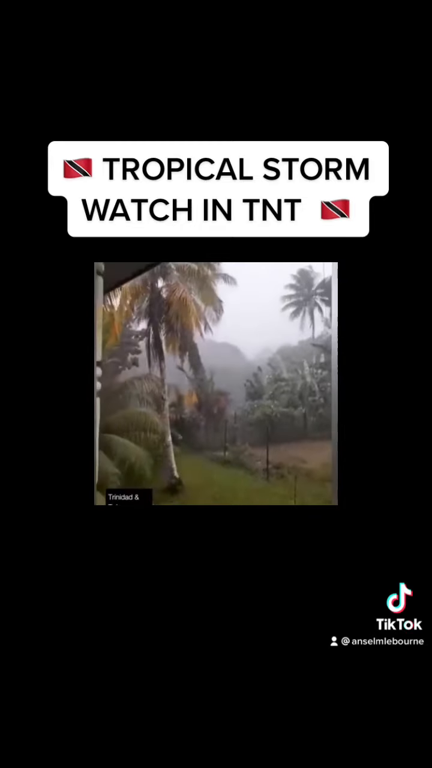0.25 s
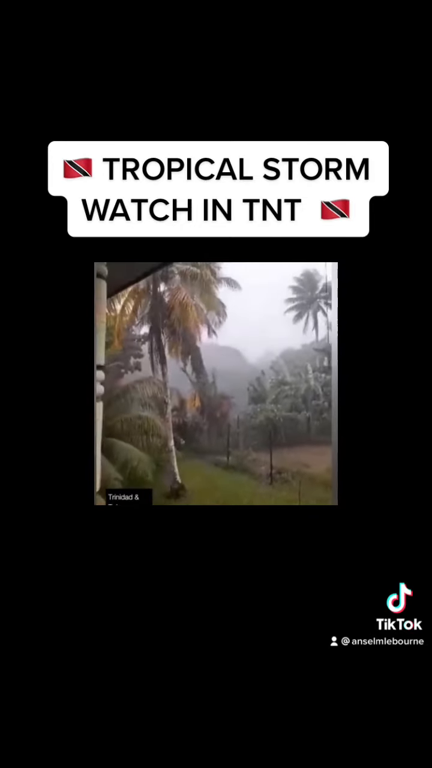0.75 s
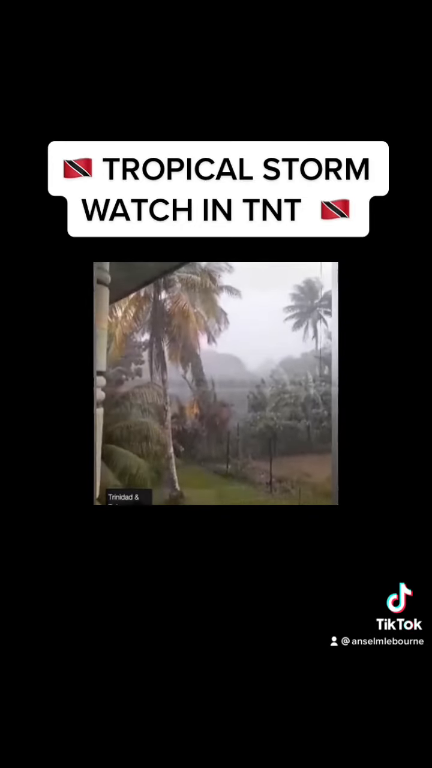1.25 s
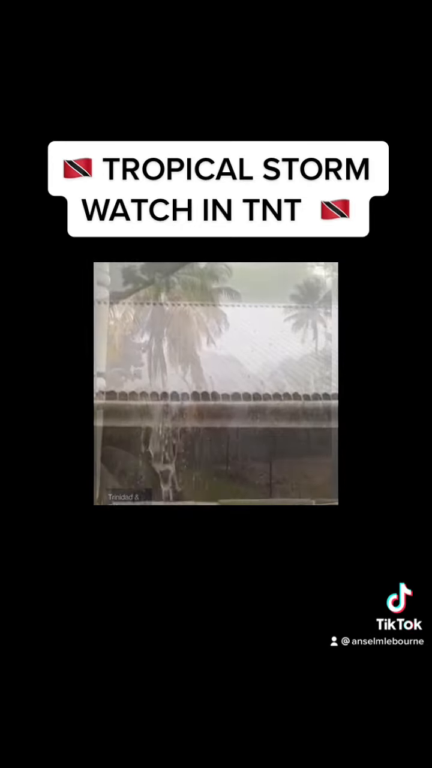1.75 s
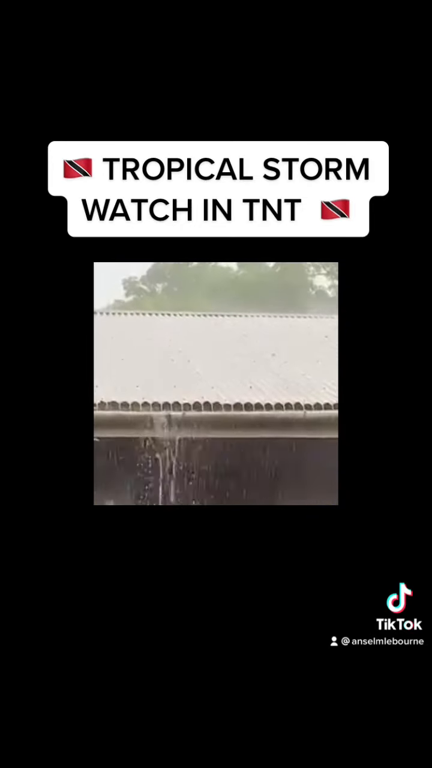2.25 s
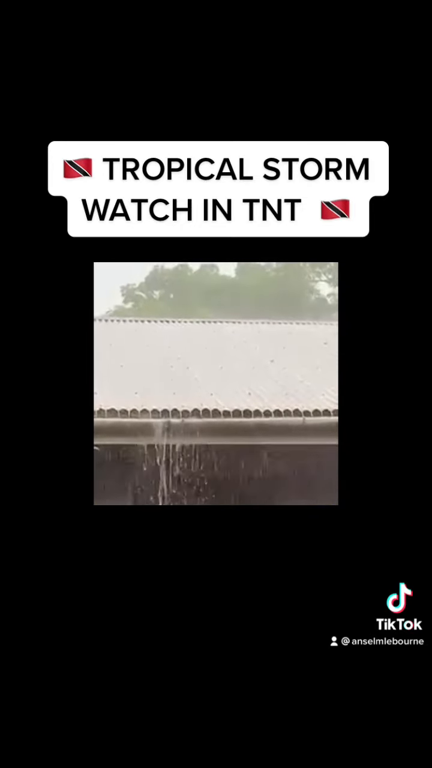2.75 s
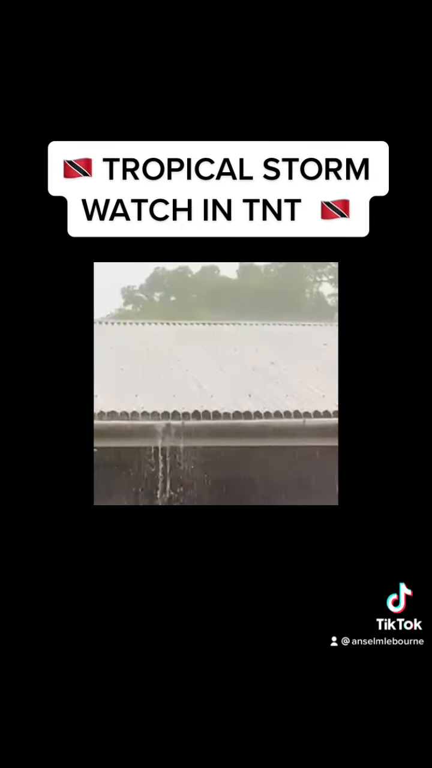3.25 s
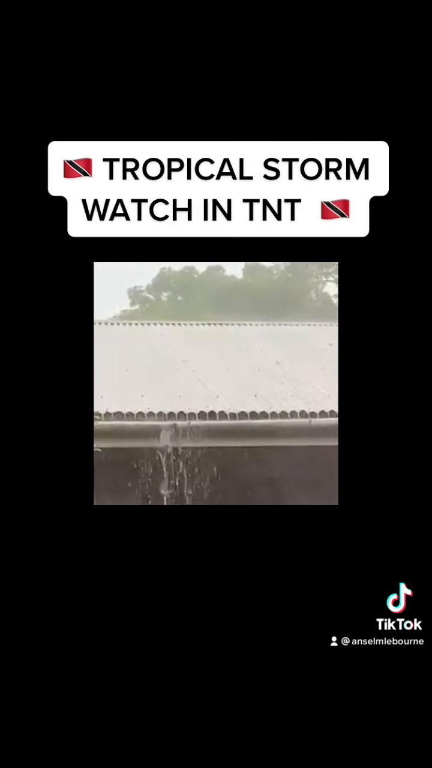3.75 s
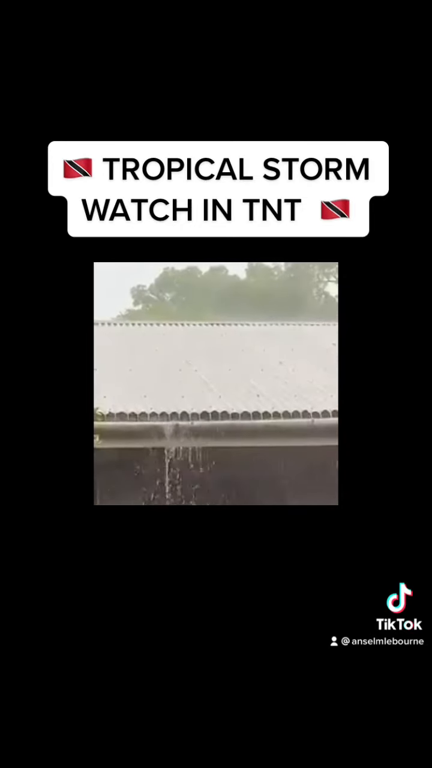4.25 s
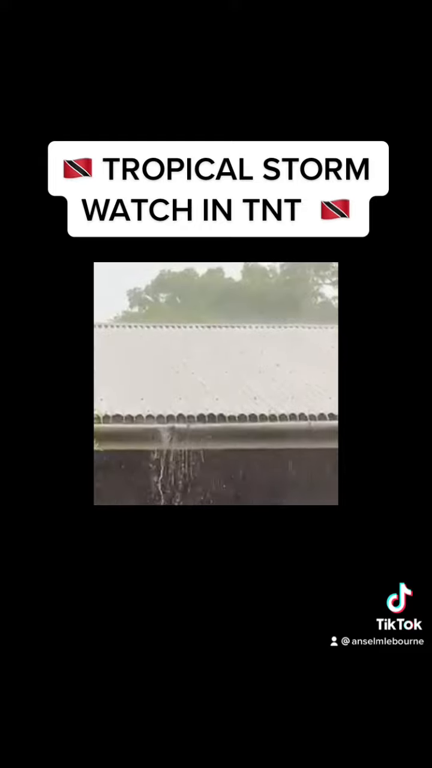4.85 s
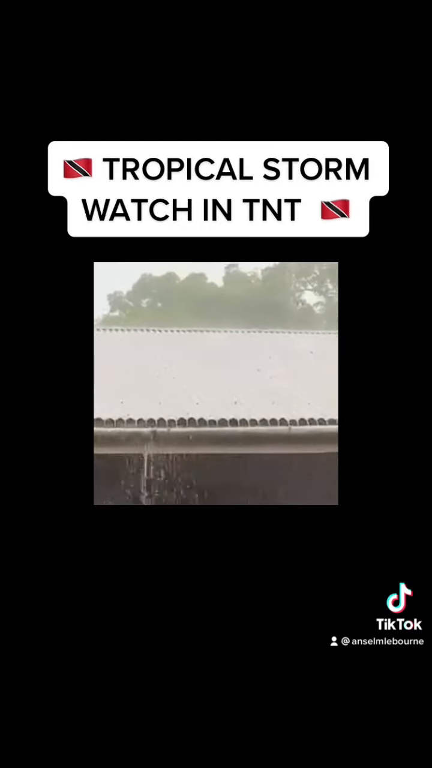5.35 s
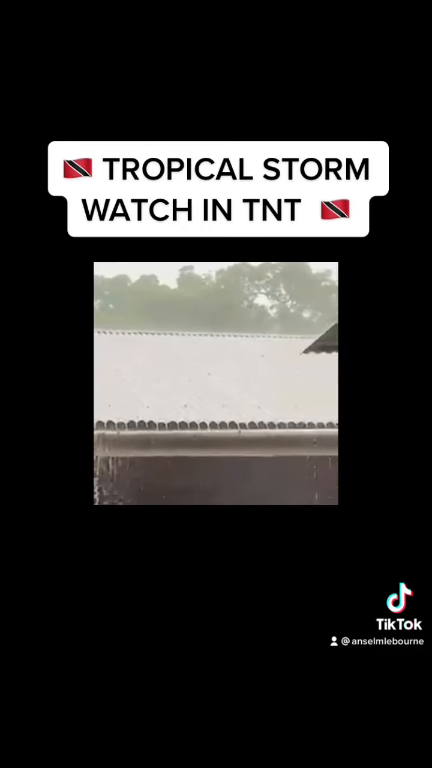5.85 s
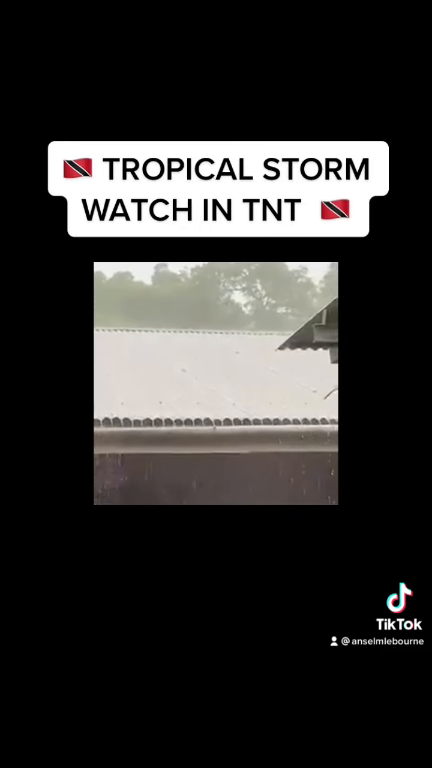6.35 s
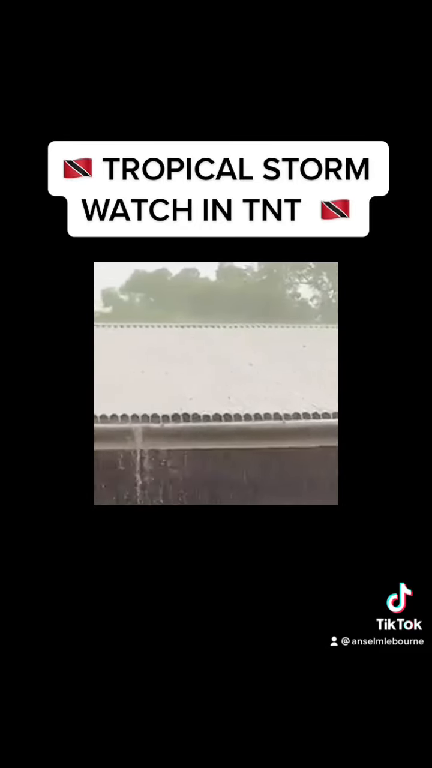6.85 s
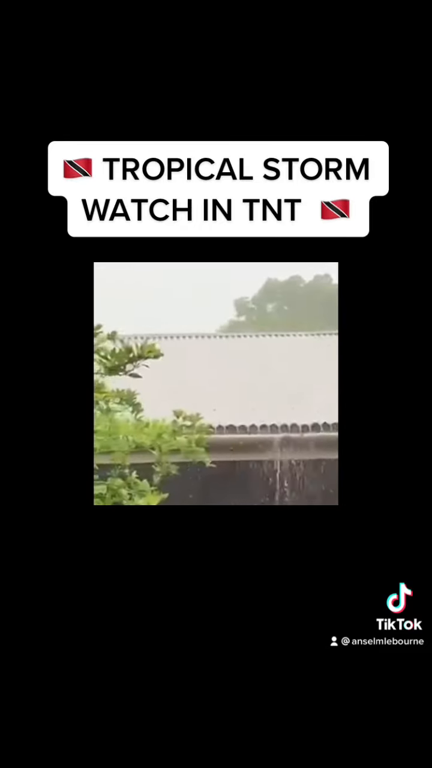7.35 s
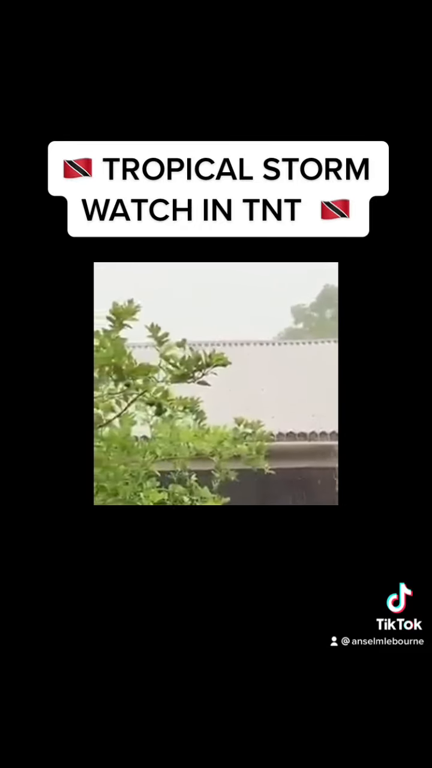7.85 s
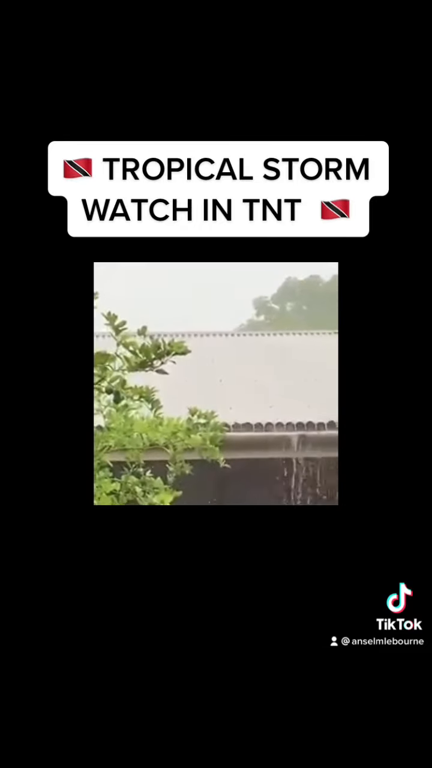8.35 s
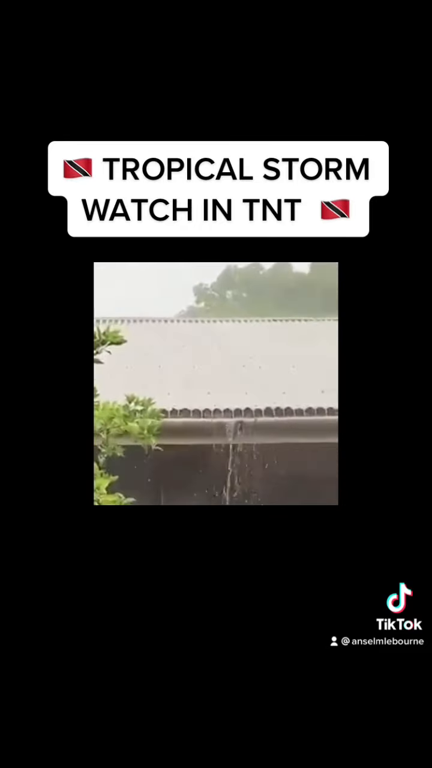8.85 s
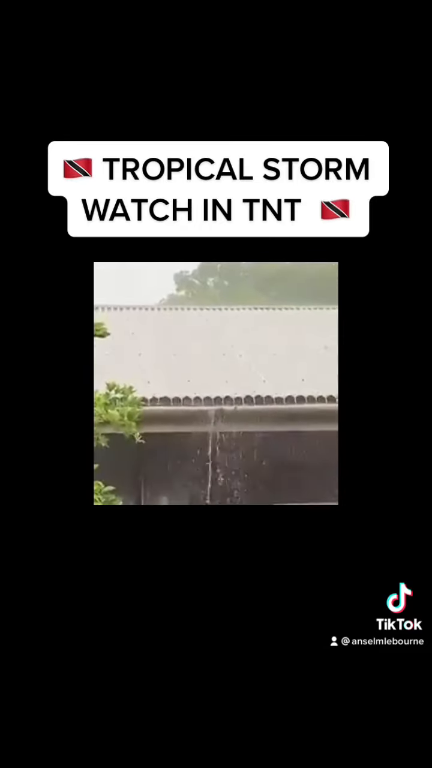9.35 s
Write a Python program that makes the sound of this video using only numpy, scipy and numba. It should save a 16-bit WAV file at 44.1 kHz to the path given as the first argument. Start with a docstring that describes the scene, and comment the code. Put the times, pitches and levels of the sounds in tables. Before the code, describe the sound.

A steady downpour shifts from a garden to a metal roof, where water splashes off the edge and larger drops tap over a wavering rumble.

```python
"""A roar of heavy tropical rain over a garden, then, from a second shelter, on a corrugated metal roof.
Thousands of drops a second blur into a wash; the level sags as one place gives way to the other.
On the roof side run-off spatters from the edge, larger drops thump the sheet, a few drips ring on
metal and one fat drop smacks nearby, while a low boom wavers underneath."""
import sys
import numpy as np
from scipy import signal
from scipy.fft import rfft, irfft
from scipy.io import wavfile
from scipy.ndimage import uniform_filter1d
from numba import njit

SR = 44100
rng = np.random.default_rng(int(sys.argv[2]) if len(sys.argv) > 2 else 0)


def inscribe(sig):
    """Save sig as 16-bit PCM at rate SR to the path in sys.argv[1].

    A 1-D sig is mono; a 2-D sig holds one channel per row.
    Samples are clipped to [-1, 1] before scaling.
    """
    pcm = np.round(np.clip(np.atleast_2d(sig).T, -1, 1) * 32767)
    wavfile.write(sys.argv[1], SR, pcm.astype(np.int16))


N = 423801
T = np.arange(N) / SR
HZ = np.maximum(np.fft.rfftfreq(N, 1 / SR), 1)

# the low boom, swelling and sinking: time_s, level_db
BOOM_LEVEL = [(1.8, -61), (2.2, -47), (2.8, -49), (3.1, -59), (3.9, -43.5), (4.05, -56), (4.35, -47),
              (5.1, -55), (5.4, -50), (5.55, -53), (6.02, -41.5), (6.25, -58), (6.74, -44), (6.87, -58),
              (7.3, -41), (7.55, -51), (7.72, -45), (8.26, -58), (8.5, -47), (8.88, -44.5), (9, -62)]
# its pitch, creeping upward: time_s, pitch_hz
BOOM_PITCH = [(1.8, 53), (3.1, 54.6), (4.6, 59), (6, 63.5), (6.8, 66), (8.3, 64.5), (9.1, 74)]
# drips on a ringing piece of metal: start_s, strike_db, left_minus_right_db
DRIPS = [(6.666, -29, 1.0), (6.7171, -27.5, -3.0), (6.772, -29, -2), (6.826, -28.5, 6), (6.858, -30, 7.0)]
# larger drops thumping the sheet: start_s, strike_db, pitch_hz
THUMPS = [(2.9674, -19, 1820), (3.6262, -19, 1600), (3.8694, -24, 2070), (4.6785, -20, 1830),
          (4.93, -26, 1830), (6.1424, -25, 1820), (8.3779, -23, 1660), (9.2144, -21, 1990)]
# the fat drop close by: start_s, peak_db, pitch_hz
SMACK = [(8.275, -6, 6300)]
# its impact and splash-back: delay_s, strike_db
SPLASH_BACK = [(0, 6), (.0003, 5), (.0008, 1), (.0014, 4), (.0019, 2), (.0045, -4), (.0097, -2), (.013, -5),
               (.0165, -2)]
# level ride of the downpour at each place: time_s, level_db
GARDEN_LEVEL = [(0, -28), (.2, -28), (.43, -28), (.5, -27.5), (.63, -26), (.75, -28.5), (.87, -27.5),
                (.95, -29.5), (1.03, -27), (1.16, -29.5), (1.25, -28.5)]
ROOF_LEVEL = [(2.2, -30.5), (2.5, -30), (2.88, -30), (2.97, -27.5), (3.1, -29), (3.4, -29), (4.3, -27.5),
              (4.9, -27.5), (5.6, -28), (6.1, -26.5), (6.9, -27.5), (7.7, -28), (9.2, -27.5), (9.61, -27.5)]
# tone colour of the rain: frequency_hz, relative_gain_db
GARDEN_COLOUR = [(10, -52), (30, -13.5), (110, 0.5), (190, -5), (280, 1), (400, -2), (700, 0), (1200, -3),
                 (2200, -3.5), (2700, -9.5), (7400, -15.5), (7800, -24), (9500, -26.5), (9950, -41)]
ROOF_COLOUR = [(25, -5.5), (95, 0), (135, 3), (160, 1.5), (182, 3), (230, -2), (300, 2.5), (360, -1),
               (480, 2), (690, 3), (830, 0.5), (1000, 1.5), (1300, 1.5), (1580, -0.3), (1800, 0.6),
               (2050, -1), (2550, -4.5), (3000, -4), (3500, -6), (4200, -8), (5200, -14), (7200, -12.5),
               (7550, -16), (7780, -22), (8000, -16), (8500, -11.5), (9680, -19), (9780, -78.5)]
# stereo width (far below 0 is mono, far above is out of phase): frequency_hz, side_minus_mid_db
GARDEN_WIDTH = [(60, -5), (190, -9), (550, -7), (1200, 0), (7700, .5), (8100, -6), (8800, -1.5),
                (10000, -3)]
ROOF_WIDTH = [(100, -48.5), (330, -12.5), (850, -1.5), (1700, -3), (2400, 2.5), (3200, -1.5), (3900, 1.5),
              (4300, 44), (5400, 84), (5750, -29.5), (6050, -21), (7400, -36.5), (7750, -17), (8100, 0),
              (8500, -3)]
# bands of the rain that flicker on their own: centre_hz
FLICKER_BANDS = [80, 200, 400, 700, 1100, 1700, 2500, 3300, 4000, 4800, 5700, 7000, 8800]


def undb(db):
    """Gain of a level in dB."""
    return 10 ** (np.asarray(db) / 20)


def over_time(table):
    """A (time_s, value) table read at every sample."""
    return np.interp(T, *np.transpose(table))


def over_frequency(table):
    """A (frequency_hz, value) table read at every frequency, on a log axis."""
    hz, value = np.transpose(table)
    return np.interp(np.log(HZ), np.log(hz), value)


def wander(rate_hz):
    """Smooth random drift: stepped values slewed twice, with a spread near 1."""
    hold = int(SR / rate_hz)
    steps = np.repeat(rng.standard_normal(N // hold + 1), hold)
    return 1.09 * uniform_filter1d(uniform_filter1d(steps, hold), hold)[:N]


@njit
def swept_band(x, hz, width_hz):
    """State-variable band-pass with a moving centre, gain 1 there."""
    out, band, low = np.empty(len(x)), 0., 0.
    for i in range(len(x)):
        tuning, damping = np.tan(np.pi * hz[i] / SR), width_hz / hz[i]
        swing = (band + tuning * (x[i] - low)) / (1 + tuning * (tuning + damping))
        band, low = 2 * swing - band, low + 2 * tuning * swing
        out[i] = damping * swing
    return out


def resonate(x, hz, width_hz):
    """Band-pass parked on one pitch."""
    return swept_band(x + 1e-18, np.full(N, float(hz)), float(width_hz))


@njit
def pings(start_s, hz, t60_s, strength):
    """Each drop sets one resonance ringing until it has died away."""
    out = np.zeros(N)
    for k in range(len(start_s)):
        start = int(start_s[k] * SR)
        pole = np.exp(2j * np.pi * hz[k] / SR - np.log(1000) / (t60_s[k] * SR))
        phasor = strength[k] + 0j
        for i in range(start, min(start + int(t60_s[k] * SR), N)):
            out[i] += phasor.imag
            phasor *= pole
    return out


def boom():
    """A low mono drone, blurred with narrow noise, that drifts in pitch and wavers in level."""
    hz = over_time(BOOM_PITCH)
    wobbling_hz = hz * (1 + .017 * wander(8.1))
    drone = np.sqrt(2) * np.sin(2 * np.pi * np.cumsum(wobbling_hz) / SR)
    blur = swept_band(rng.standard_normal(N), hz, width_hz=1.2)
    return undb(over_time(BOOM_LEVEL) + wander(11)) * (drone + .5 * blur / np.std(blur))


def drips(pitch_hz=2410, t60_s=.13):
    """A few drips strike sheet metal softly and ring on one note."""
    start_s, strike_db, pan_db = np.transpose(DRIPS)
    each = np.ones(len(DRIPS))
    ears = [pings(start_s, pitch_hz * each, t60_s * each, undb(strike_db + side * pan_db / 2))
            for side in (1, -1)]
    # the soft contact takes a few cycles to build the ring
    return np.array([resonate(ear, pitch_hz, width_hz=150) for ear in ears])


def thumps(t60_s=.022):
    """Larger drops land softly and ring the sheet briefly; two band-passes round off the attack."""
    start_s, strike_db, hz = np.transpose(THUMPS)
    sheet = pings(start_s, hz, np.full(len(THUMPS), t60_s), undb(strike_db))
    for _ in range(2):
        sheet = resonate(sheet, np.mean(hz), width_hz=1500)
    return sheet


def smack(spray_db=-14, spray_decay_s=.012, knock_hz=2200):
    """A fat drop cracks brightly, thrown-up droplets land after it and fine spray hisses briefly."""
    out = np.zeros((2, N))
    for start_s, peak_db, pitch_hz in SMACK:
        splash = np.zeros((2, N))
        for delay_s, strike_db in SPLASH_BACK:
            splash[:, int((start_s + delay_s) * SR)] = undb(strike_db)
        spray = (T > start_s) * np.exp(-np.maximum(T - start_s, 0) / spray_decay_s)
        splash += undb(spray_db) * spray * rng.standard_normal((2, N))
        crack = np.array([resonate(ear, pitch_hz, width_hz=1700) for ear in splash])
        # the struck surface answers with a lower knock
        knock = np.array([resonate(ear, knock_hz, width_hz=900) for ear in splash])
        hit = crack + knock
        out += undb(peak_db) * hit / np.max(np.abs(hit))
    return out


def patter(tick_chance, spread_db, ping_db, ring_s, ping_count=30000):
    """Hiss of countless far drops, ticks of near ones, and pings off sheet, leaf or puddle."""
    lands = rng.random(N) < tick_chance
    size = np.minimum(rng.exponential(1, N), 5)
    hiss = rng.standard_normal(N)
    ticks = lands * undb(spread_db * size) * np.sign(hiss)
    when, pitch, length, blow = rng.random((ping_count, 4)).T
    hz = 200 + 9600 * pitch
    t60_s = ring_s * (.5 + length) * (hz / 1000) ** -.3
    # low pings are alike, high ones differ more in strength
    strike_db = -3.5 * np.clip(hz / 1500, .45, .9) * np.log(blow + .015)
    ringing = pings(when * N / SR, hz, t60_s, undb(strike_db) / np.sqrt(t60_s))
    return hiss + ticks + undb(ping_db) * ringing / np.std(ringing)


def rain(level, colour, width, drops, lag_share, flicker_db, spatter_db, sizzle_db):
    """Patter shaped into a wide roar; each band flickers and uneven run-off shakes the treble as one."""
    mid, side = rfft([patter(**drops), patter(**drops)])
    # some drops reach the left ear early and a touch louder: phase-shifted mid joins the side
    side = np.sqrt(1 - lag_share ** 2) * side + np.exp(1.4j) * lag_share * mid
    side_share = 1 / (1 + undb(-2 * over_frequency(width)))
    spectra = np.array([mid, side]) * undb(over_frequency(colour)) * np.sqrt([1 - side_share, side_share])
    body = (HZ > 300) & (HZ < 3500)  # this range of the mid sets the level
    spectra *= N / np.sqrt(2 * np.sum(np.abs(spectra[0, body]) ** 2))
    run_off = wander(11)
    roar = np.zeros((2, N))
    for hz, only_this in zip(FLICKER_BANDS, np.eye(len(FLICKER_BANDS))):
        band = np.interp(np.log(HZ), np.log(FLICKER_BANDS), only_this)  # triangles that add up to one
        sizzle = max(1 - abs(np.log2(hz / 6500)), 0)  # bands near 6500 Hz flicker most
        treble = np.clip(np.log2(hz / 700) / 3, 0, 1)
        gain_db = (flicker_db + sizzle_db * sizzle) * wander(12) + spatter_db * treble * run_off
        roar += undb(gain_db) * irfft(spectra * band, N)
    mid, side = roar * undb(over_time(level))
    return np.array([mid + side, mid - side])


def scene(fade_start_s=1.34, fade_s=.75, cut_at_s=1.76, cut_s=.019):
    """The roof swells up under the fading garden, which then drops out quickly as the boom enters."""
    garden_drops = dict(tick_chance=.07, spread_db=-.65, ping_db=-.46, ring_s=.23)
    roof_drops = dict(tick_chance=.008, spread_db=2, ping_db=-1.4, ring_s=.17)
    garden = rain(GARDEN_LEVEL, GARDEN_COLOUR, GARDEN_WIDTH, garden_drops,
                  lag_share=.05, flicker_db=.7, spatter_db=.4, sizzle_db=.4)
    roof = rain(ROOF_LEVEL, ROOF_COLOUR, ROOF_WIDTH, roof_drops,
                lag_share=.3, flicker_db=.85, spatter_db=.9, sizzle_db=1.4)
    fade = np.clip((T - fade_start_s) / fade_s, 0, 1)
    cut = np.clip(.5 + (T - cut_at_s) / cut_s, 0, 1)
    downpour = (1 - cut) * (1 - fade) * garden + fade * roof
    return cut * boom() + drips() + thumps() + smack() + downpour


def record(dry, low_cut_hz=28, high_cut_hz=10000):
    """The phone drops the deepest bass and cuts the top steeply."""
    low_cut = signal.butter(2, low_cut_hz, "high", fs=SR, output="sos")
    high_cut = signal.ellip(12, .3, 90, high_cut_hz, fs=SR, output="sos")
    return signal.sosfilt(high_cut, signal.sosfilt(low_cut, dry))


dry = scene()
out = record(dry)
inscribe(out)
```